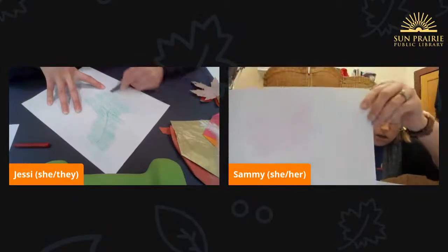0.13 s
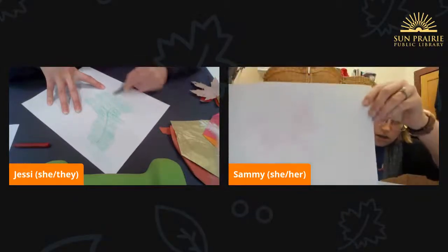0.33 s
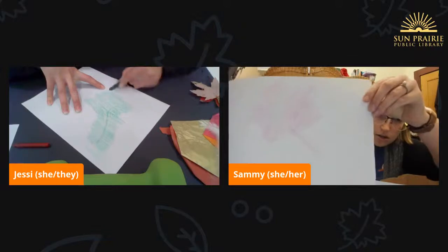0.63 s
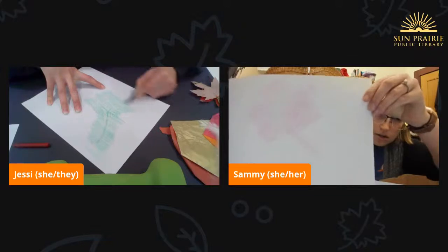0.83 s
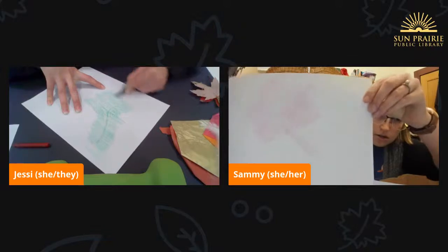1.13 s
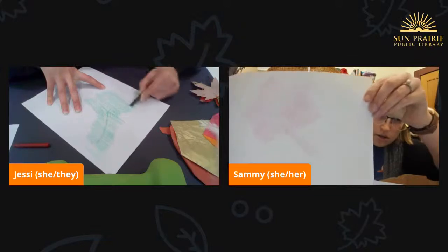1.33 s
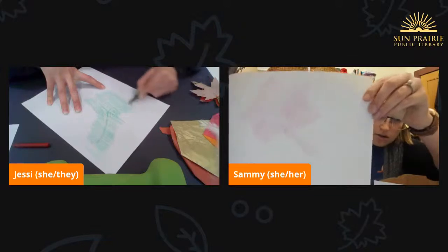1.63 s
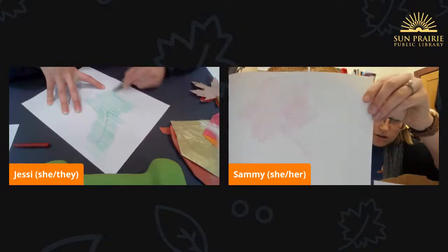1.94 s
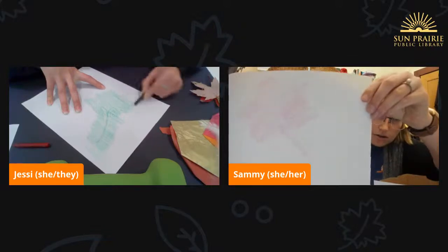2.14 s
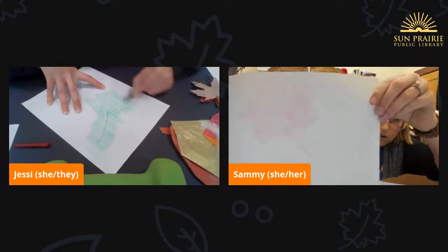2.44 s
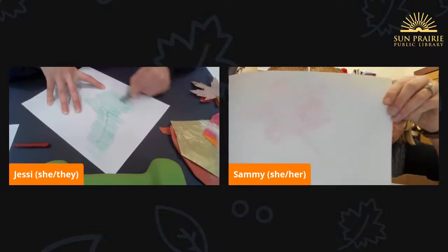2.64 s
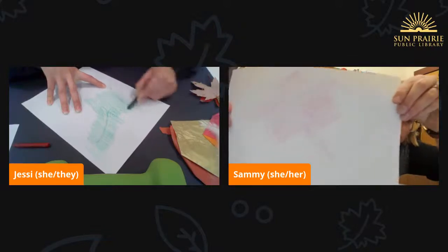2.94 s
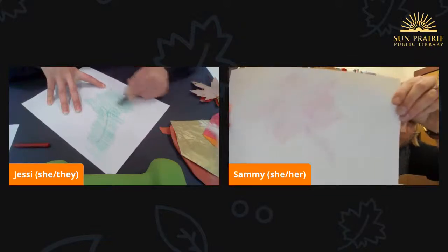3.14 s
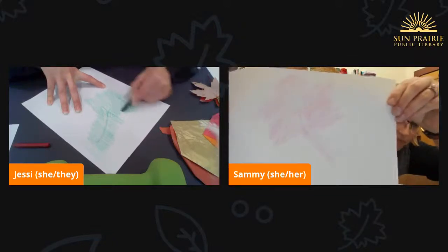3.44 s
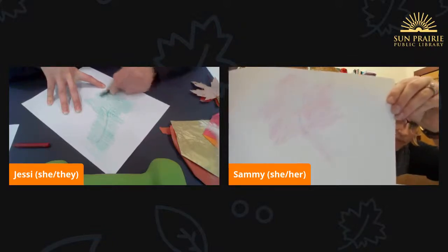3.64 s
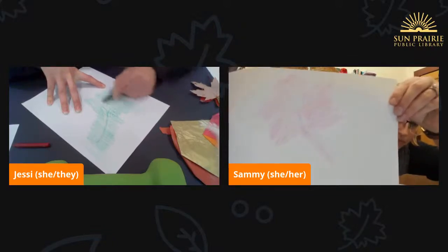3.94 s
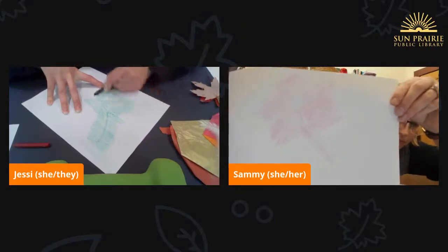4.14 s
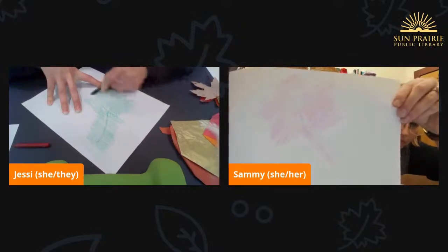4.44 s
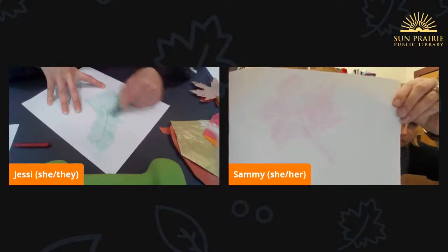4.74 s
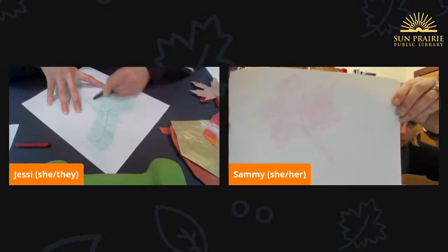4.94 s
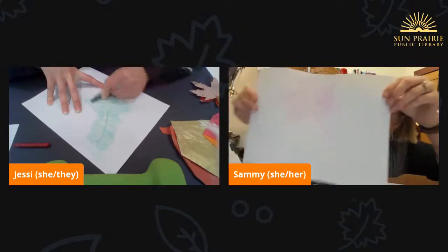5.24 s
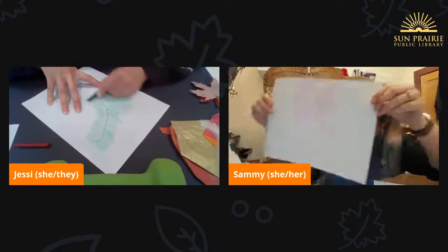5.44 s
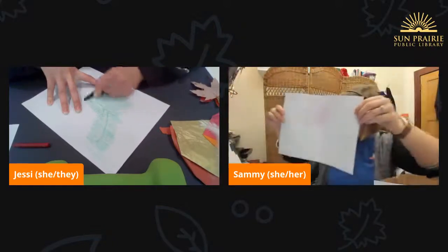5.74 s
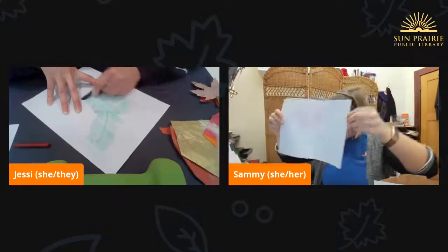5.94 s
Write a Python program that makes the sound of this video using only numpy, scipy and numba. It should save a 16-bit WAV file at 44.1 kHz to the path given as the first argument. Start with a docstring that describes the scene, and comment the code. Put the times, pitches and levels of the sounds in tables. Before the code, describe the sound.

Close up in a quiet room, a wax crayon rubs paper on a hard table, about four back-and-forth trips a second. For nearly three seconds it is a soft, airy hiss with a few small taps and dull low hand thumps. Then the strokes turn hard and raspy, the table murmurs, and hollow knocks come thick and uneven, ending with bright scrapes before easing off.

```python
"""Light hissing strokes, about seven a second: a wax crayon rubs back and forth over paper on a hard table.
Hard strokes follow, with rasp, knocks and scrapes. Hiss and rasp are coloured random wax slips driven by hand speed.
Knocks excite a modal table response as the crayon trips over ridges; many small bumps make the table murmur.
The leaning hand swells a low table mode, the blunt end rocks in short low tones; a quiet room adds noise and hum."""
import sys
import numpy as np
from scipy import signal
from scipy.fft import rfft, irfft
from scipy.io import wavfile
from scipy.ndimage import uniform_filter1d
from numba import njit

SR = 44100
rng = np.random.default_rng(int(sys.argv[2]) if len(sys.argv) > 2 else 0)


def wrap_up_sound(samples):
    """Save the sound to the file named by the first command line argument, as 16-bit audio."""
    columns = np.atleast_2d(samples).T
    # keep every value between -1 and 1, then stretch to whole-number steps
    tamed = np.clip(columns, -1, 1)
    steps = np.round(tamed * 32767).astype(np.int16)
    wavfile.write(sys.argv[1], SR, steps)


N = 268304
TIME_S = np.arange(N) / SR
BLOW_N = 1323  # samples (30 ms) over which an impact's level is set


def undb(db):
    """Decibels to gain."""
    return 10 ** (np.asarray(db) / 20)


def unit(x, size=None):
    """Scale to rms 1, judged on the first size samples."""
    return x / np.sqrt(np.mean(x[:size] ** 2) + 1e-30)


def along(points, hz):
    """Interpolate (f/Hz, value) points on a log-frequency axis."""
    f_hz, value = np.transpose(points)
    return np.interp(np.log(np.maximum(hz, 1)), np.log(f_hz), value)


def at_time(points, time_s):
    """Interpolate (t/s, value) points linearly."""
    return np.interp(time_s, *np.transpose(points))


def colour(x, points, size=2048):
    """Minimum-phase filter with the given (f/Hz, level/dB) outline, via the folded cepstrum."""
    gain = undb(along(points, np.fft.rfftfreq(size, 1 / SR)))
    cepstrum = irfft(np.log(gain))
    cepstrum[1:size // 2] *= 2
    cepstrum[size // 2 + 1:] = 0
    impulse = irfft(np.exp(rfft(cepstrum)))
    return signal.fftconvolve(x, impulse)[:len(x)]


def add(track, sound, start_s):
    """Mix a sound into the track from start_s on, clipped to the track's ends."""
    i = int(start_s * SR)
    sound, i = sound[max(-i, 0):], max(i, 0)
    track[i:i + len(sound)] += sound[:max(len(track) - i, 0)]


def walk(rate_hz):
    """Smooth random wandering, rms 1."""
    k = max(int(SR / rate_hz), 1)
    steps = np.repeat(rng.standard_normal(N // k + 1), k)
    return unit(uniform_filter1d(steps, k)[:N])


def grains(n, per_s, spread_db):
    """Tiny slips of wax on paper fibres: random impulses of very unequal size, rms 1."""
    slips = rng.random(n) < per_s / SR
    size = undb(spread_db * np.minimum(rng.exponential(size=n), 4))
    return unit(slips * rng.standard_normal(n) * size)


@njit
def resonance(x, hz, width_hz):
    """State-variable band-pass whose centre moves sample by sample."""
    y, b, l = np.empty(len(x)), 0., 0.
    for i in range(len(x)):
        g = np.tan(np.pi * hz[i] / SR)
        v = (b + g * (x[i] - l)) / (1 + g * (g + width_hz / hz[i]))
        b, l = 2 * v - b, l + 2 * g * v
        y[i] = v * width_hz / hz[i]
    return y


def roam(x, depth_db):
    """As the tip travels, narrow resonances of sheet and crayon come and go, mostly in the middle treble."""
    f_hz, _, bands = signal.stft(x, SR, nperseg=512)
    field = rng.standard_normal(bands.shape)
    for axis, size in ((0, 4), (0, 2), (1, 8), (1, 4)):
        field = uniform_filter1d(field, size, axis=axis)
    share = along([(1000, .7), (3000, 1), (6500, 1), (12000, .35)], f_hz)
    gain = undb(depth_db * share[:, None] * unit(field))
    gain /= np.sqrt(np.mean(gain ** 2, axis=1, keepdims=True))
    return unit(signal.istft(bands * gain, SR)[1][:N])


# hand rhythm: [t/s, there-and-back trips made so far]
RHYTHM = [(-0.068, 0), (1.269, 5), (2.621, 10), (3.673, 14), (4.767, 18), (5.3, 20), (6.082, 23)]
# hand effort as forward-sweep hiss before trim: [t/s, level/dB]
EFFORT = [(0.0, -68), (0.8, -66), (1.08, -70.3), (1.35, -65), (2.13, -63.5), (2.66, -71.5), (2.94, -54.5),
          (3.2, -59.5), (3.5, -58.5), (4.58, -55.5), (4.83, -64), (5.08, -57.5), (5.4, -61), (5.62, -55),
          (5.85, -68), (6.08, -73)]
# return sweep against forward sweep: [t/s, level/dB]
EASE = [(0.1, -6.5), (0.4, -3), (1.2, -6.5), (1.75, -3.2), (2.8, -5), (3.06, -11), (3.35, -9.5), (3.6, -4),
        (4.42, -13), (4.95, -4), (5.2, -6), (5.75, -5)]
# bite of wax on paper as rasp over hiss before trims: [t/s, level/dB]
BITE = [(0.0, -5.7), (1.35, -3.8), (2.0, -8), (2.75, -10), (3.15, -1.5), (3.85, 2.5), (4.6, 0), (4.85, 3),
        (5.2, 0.5), (5.5, 5), (6.08, 8)]
FORWARD_SHARE = 0.46  # of trip time
LIGHT_DB, HARD_DB = -67, -57.5  # effort of an easy and of a vigorous hand
# fastest point as share of a sweep: easy; vigorous, each way
CREST_LIGHT, CREST_FORWARD, CREST_RETURN = 0.6, 0.47, 0.62


def motion(rest=0.035, swell=1.8):
    """Hand speed (0-1), with hiss and rasp gains: speed to a power, scaled by the stroke's force."""
    trip, phase = np.divmod(at_time(RHYTHM, TIME_S), 1)
    back = phase > FORWARD_SHARE
    way = np.where(back, (phase - FORWARD_SHARE) / (1 - FORWARD_SHARE), phase / FORWARD_SHARE)
    # each sweep keeps the settings read at one instant near its middle
    middle_s = np.interp(trip + (back + .5) / 2, *np.transpose(RHYTHM)[::-1])
    effort_db, ease_db, bite_db = (at_time(curve, middle_s) for curve in (EFFORT, EASE, BITE))
    vigour = np.clip((effort_db - LIGHT_DB) / (HARD_DB - LIGHT_DB), 0, 1)
    vigorous_crest = np.where(back, CREST_RETURN, CREST_FORWARD)
    crest = np.clip(CREST_LIGHT + vigour * (vigorous_crest - CREST_LIGHT), .2, .8)
    # zero at each turn, 1 at the crest
    speed = np.abs(np.sin(np.pi / 2 * np.minimum(way / crest, (1 - way) / (1 - crest))))
    force = undb(uniform_filter1d(effort_db + back * ease_db, size=500))
    hiss = (rest + speed ** swell) * force
    return speed, hiss, hiss * undb(uniform_filter1d(bite_db, size=500))


# fine slip spectrum: [f/Hz, density/dB per Hz]
HISS = [(900, -23.5), (1900, -3.5), (2300, 1), (2800, -5), (7600, 0.5), (8300, 4), (9400, 6.5), (10800, 1),
        (15500, 1.5)]
# coarse slip spectrum: [f/Hz, density/dB per Hz]
RASP = [(500, 8.5), (1200, 5), (2500, -4.5), (4700, -0.5), (6300, -4.5), (7500, -10), (15000, -17.5)]


def rubbing(hiss_db=3.5, rasp_db=8.0, slow_hz=3300, fast_hz=5900, rough_db=1.5):
    """Wax slips over the paper's tooth; bite adds a rasp, and a chatter whose pitch follows the speed."""
    speed, hiss, rasp = motion()
    tooth = undb(rough_db * walk(170) + 1.22 * walk(35))
    fine = roam(colour(grains(N, per_s=16000, spread_db=2.2), HISS), depth_db=3.3)
    coarse = roam(colour(grains(N, per_s=6000, spread_db=2.6), RASP), depth_db=5.5)
    pitch_hz = (slow_hz + (fast_hz - slow_hz) * speed) * (1 + .12 * walk(6))
    pitch_hz = np.clip(pitch_hz, 500, SR / 4)
    narrow = resonance(resonance(rng.standard_normal(N), pitch_hz, 420.), pitch_hz, 420.)
    # chatter level wanders
    chatter = undb(-8) * unit(narrow * undb(5 * walk(16)))
    # a light hand leaves mainly fine hiss
    pressed = np.sqrt(np.maximum(rasp ** 2 - (0.45 * hiss) ** 2, (.3 * rasp) ** 2))
    return tooth * (hiss * undb(hiss_db) * fine + pressed * (undb(rasp_db) * coarse + chatter))


TABLE_T60_S, T60_SLOPE = 0.11, 0.48  # T60 at 1 kHz; exponent of its fall with frequency


def fade(hz, t_s):
    """Modal decay: the table rings longest in the bass."""
    t60_s = TABLE_T60_S * (hz / 1000) ** -T60_SLOPE
    return np.exp(-np.log(1000) * t_s / t60_s)


# table-top modes before per-spot scatter: [f/Hz, level/dB]
TABLE_MODES = [(215, -5), (290, -1.5), (360, -1), (440, -8.5), (492, 0), (535, 1.5), (830, -3), (875, -1),
               (1042, -2.5), (1178, -6), (1442, -0.5), (1720, -7.5), (2072, -6.5), (2330, -5), (2875, -15)]


def table_response(scatter_db=3.0, dense_db=1, direct=17, lag_s=0.002832,
                   late_db=-29, late_t60_s=0.83, size=16384):
    """The table top struck at one spot: first wave, modes, and a dense tail that dies in the room."""
    t_s, f_hz = np.arange(size) / SR, np.fft.rfftfreq(size, 1 / SR)
    hz, db = np.transpose(TABLE_MODES)[:, :, None]
    # every spot favours other modes
    gain = undb(db + scatter_db * rng.standard_normal(hz.shape))
    tones = np.sin(2 * np.pi * (hz * t_s + rng.random(hz.shape)))
    modes = np.sum(gain * tones * fade(hz, t_s), axis=0)
    noise = rng.standard_normal(size)
    dense = noise * undb(late_db) * np.exp(-np.log(1000) * t_s / late_t60_s)
    centres_hz = np.geomspace(200, 5000, 4)
    for own, centre_hz in zip(np.eye(len(centres_hz)), centres_hz):
        band = irfft(rfft(noise) * along(np.c_[centres_hz, own], f_hz))
        dense += band * fade(centre_hz, t_s)
    dense[2] += direct
    dense = colour(dense, [(150, -8), (450, -1.5), (1500, -4.0), (12000, -22.0)])
    blow = unit(modes, size=BLOW_N) + undb(dense_db) * unit(dense, size=BLOW_N)
    # dispersive bending waves: treble first, bass behind
    delay_s = lag_s * np.maximum((1000 / np.maximum(f_hz, 200)) ** 1.3 - .3, 0)
    blow = irfft(rfft(blow) * np.exp(-2j * np.pi * np.cumsum(delay_s) * SR / size))
    # smooth end of tail
    return blow * np.minimum(2 * (1 - t_s / t_s[-1]), 1) ** 2


# table shake under the dragging crayon, before trim: [t/s, level/dB]
DRAG = [(0.0, -71.5), (2.54, -74), (3.05, -56.5), (3.76, -62.5), (4.05, -53), (5.96, -56), (6.08, -64)]
# murmur filter: [f/Hz, gain/dB]
JUDDER = [(60, -23.5), (200, 8), (450, 0), (900, -9.5), (5000, -52)]


def judder(drag_db=2, rest=0.28):
    """Small bumps under the moving crayon, denser in force with speed, keep the table top murmuring."""
    speed = motion()[0]
    impulses = grains(N, per_s=630, spread_db=2.5) * (rest + speed)
    shaken = signal.fftconvolve(impulses, table_response(dense_db=5.5))[:N]
    murmur = unit(colour(shaken, JUDDER))
    return murmur * undb(drag_db + at_time(DRAG, TIME_S))


# room noise spectrum: [f/Hz, density/dB per Hz]
ROOM = [(25, -8), (60, -15), (105, 12), (230, 3.5), (400, -10.5), (1200, -32), (15000, -31)]
ROOM_DB, HUM_HZ, HUM_DB = -62.5, 358.4, -73  # noise before its wander; hum centre and rms


def room():
    """Low room noise and a faint hum, wavering in pitch and level."""
    air = unit(colour(rng.standard_normal(N), ROOM)) * undb(2 * walk(9.8))
    hum_hz = HUM_HZ + 2 * walk(7.45)
    hum = np.sin(2 * np.pi * np.cumsum(hum_hz) / SR) * undb(2 * walk(7.3))
    return undb(ROOM_DB) * air + undb(HUM_DB) * unit(hum)


# wax scuff filter: [f/Hz, gain/dB]
SCUFF = [(2000, -15), (4000, 0), (5500, 3), (6300, 4.5), (7600, -7.5), (9500, -7), (15500, -26.5)]


def scuff(t_s, decay_s=0.012, rise_s=0.0016):
    """A short coloured burst of slipping wax that starts at t = 0."""
    after_s = np.maximum(t_s, 0)
    envelope = (1 - np.exp(-after_s / rise_s)) * np.exp(-after_s / decay_s)
    return colour(grains(len(t_s), per_s=5000, spread_db=-1.5) * envelope, SCUFF)


# trips over ridges: [t/s, ring level/dB, hardness = click over ring/dB]
KNOCKS = [(0.018, -46.5, -15), (0.267, -51.5, -2), (1.07, -63, -9), (1.3437, -42, -5),
          (2.963, -43.5, -10.5), (3.218, -54, -13), (3.4896, -33.5, -6.5), (3.762, -31, -4.5),
          (3.843, -44, -13), (3.8945, -33, -6), (3.993, -36.5, -11.5), (4.038, -38, -10),
          (4.171, -23.5, -12.5), (4.263, -29.5, -14.5), (4.4493, -32.5, -11), (4.534, -38, -18),
          (4.576, -37, -15.5), (4.727, -34.5, -11.5), (4.806, -37.5, -13.5), (4.958, -29.5, -9.5),
          (5.071, -39.5, -11), (5.233, -37, -2), (5.336, -47.5, -4), (5.4849, -25, -5),
          (5.5301, -33.5, 1.5), (5.587, -37, -3.5), (5.7445, -27, -1.5), (5.866, -46.5, -5.5),
          (5.998, -37, 1)]
# table ring filter before focus: [f/Hz, gain/dB]
RING = [(50, -24), (190, 3), (450, -1.5), (1200, 1.5), (4000, -36)]
# contact click filter before dulling: [f/Hz, gain/dB]
CLICK = [(700, -28.5), (1550, 10), (2200, 6), (4000, 4.5), (5200, -7), (8000, -52)]
RING_HZ, RING_AT_DB = 975, -40  # ring centre for a knock of this level, at hardness 0
# harder contact raises the centre, heavier contact lowers it
OCTAVES_PER_HARDNESS_DB, OCTAVES_PER_STRENGTH_DB = 0.014, -0.014
KNOCK_SCUFF_DB = -25.5  # re ring


def knocks(dulling=0.71, climb_s=0.0034, climb=0.039, skid_s=0.0035, skid=0.05, focus_db=6.3):
    """The crayon climbs a ridge, drops off and skids: a scuff of wax, a click, then the table's hollow ring."""
    out = np.zeros(N)
    t_s = np.arange(-BLOW_N, 4 * BLOW_N) / SR
    f_hz = np.geomspace(50, 16000, 40)
    climbing = climb * np.exp(np.minimum(t_s, 0) / climb_s) * (t_s < 0)
    skidding = skid * (t_s > 0) * np.exp(-np.maximum(t_s, 0) / skid_s)
    for at_s, ring_db, hardness_db in KNOCKS:
        octaves = OCTAVES_PER_HARDNESS_DB * hardness_db + OCTAVES_PER_STRENGTH_DB * (ring_db - RING_AT_DB)
        ring_hz = RING_HZ * 2 ** octaves
        click_db, scuff_db = ring_db + hardness_db, ring_db + KNOCK_SCUFF_DB
        force = (t_s == 0) + grains(len(t_s), per_s=3000, spread_db=1.0) * (climbing + skidding)
        blow = signal.fftconvolve(force, table_response())
        # contact length decides which modes take most of the blow
        focus = focus_db * np.minimum(np.log2(f_hz / ring_hz) ** 2, 2)
        ring = colour(blow, np.c_[f_hz, along(RING, f_hz) - focus])
        # light touch = longer contact = less treble
        dull_db = dulling * max(-40 - click_db, 0) * np.clip(np.log2(f_hz / 1700), 0, 2)
        click = colour(blow, np.c_[f_hz, along(CLICK, f_hz) - dull_db])
        for sound, db in ((ring, ring_db), (click, click_db), (scuff(t_s), scuff_db)):
            level = np.std(sound[BLOW_N:2 * BLOW_N])
            add(out, undb(db) * sound / level, at_s - BLOW_N / SR)
    return out


# hand leaning on the table: [t/s, peak level of the mode/dB, swell and ebb time/s]
THROBS = [(0.49, -40, 0.034), (1.108, -44.5, 0.016), (1.311, -37, 0.032), (1.442, -40, 0.042),
          (1.605, -45.5, 0.057), (2.194, -46.5, 0.02), (3.012, -43, 0.048), (4.347, -48, 0.035),
          (4.602, -39.5, 0.018), (5.012, -36.5, 0.025), (5.138, -34.5, 0.034), (5.401, -33, 0.024),
          (5.633, -34, 0.04)]


def throbs(pitch_hz=108, rumble_db=-13):
    """Each soft push of the hand swells a low table mode, with a little dull rumble above it."""
    outline = [(70, -27), (130, -3.0), (220, -2), (350, -31.5), (2000, -50)]
    rumble = unit(colour(rng.standard_normal(N), outline))
    mode_hz = pitch_hz * (1 + 0.0698 * walk(25))
    mode = np.cos(2 * np.pi * np.cumsum(mode_hz) / SR)
    push = sum(undb(db) * np.exp(-((TIME_S - at_s) / swell_s) ** 2) for at_s, db, swell_s in THROBS)
    return push * (mode + undb(rumble_db) * rumble)


# blunt end rocking on the table: [t/s, crest rms of the tone/dB, f/Hz]
BUMPS = [(0.539, -55, 545), (2.046, -58, 294), (2.689, -47.5, 355), (2.715, -49, 330), (3.071, -51.5, 470),
         (3.315, -47, 490), (3.579, -44, 501), (3.849, -36, 483), (3.87, -35.5, 465), (4.124, -35, 511),
         (4.149, -35.5, 518), (4.313, -39.5, 576), (4.398, -36, 494), (4.675, -39, 557), (4.918, -41, 474)]


def bumps(rise_s=0.0052, fall_s=0.011, rough_db=-2):
    """The blunt end rocks on the table: a few rough cycles of one low resonance, no click."""
    out = np.zeros(N)
    t_s = np.arange(-BLOW_N, 3 * BLOW_N) / SR
    swell = np.where(t_s < 0, np.exp(-(t_s / rise_s) ** 2), np.exp(-np.abs(t_s) / fall_s))
    for at_s, db, hz in BUMPS:
        tone = unit(np.sin(2 * np.pi * (hz * t_s + rng.random())))
        outline = [(hz / 8, -25), (hz / 2.5, -3), (hz, 0), (2 * hz, -10), (6 * hz, -44)]
        rough = unit(colour(rng.standard_normal(len(t_s)), outline))
        add(out, undb(db) * swell * (tone + undb(rough_db) * rough), at_s - BLOW_N / SR)
    return out


# wax digging in: [t/s, rms level over the first 30 ms/dB]
SCRAPES = [(3.761, -50), (3.894, -53), (4.449, -56), (4.727, -45.5), (4.959, -46), (5.072, -51),
           (5.233, -37.5), (5.336, -41.5), (5.5302, -38.5), (5.587, -35.5)]


def scrapes():
    """Where the wax digs in, the scuff is loud and bright."""
    out = np.zeros(N)
    t_s = np.arange(4 * BLOW_N) / SR
    for at_s, db in SCRAPES:
        add(out, undb(db) * unit(scuff(t_s), size=BLOW_N), at_s)
    return out


def scene():
    """Crayon, table and room summed at one small, close microphone."""
    return (rubbing() + judder() + room() + knocks() + throbs() + bumps() + scrapes())[None]


TOP_HZ = 15850


def record(dry):
    """Steep elliptic low-pass at TOP_HZ."""
    return signal.sosfilt(signal.ellip(10, .2, 70, TOP_HZ, fs=SR, output="sos"), dry)


dry = scene()
out = record(dry)
wrap_up_sound(out)
```